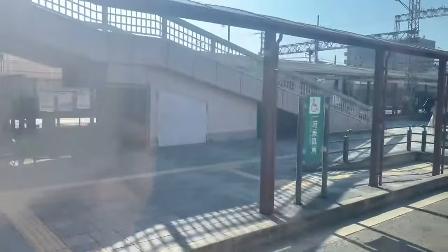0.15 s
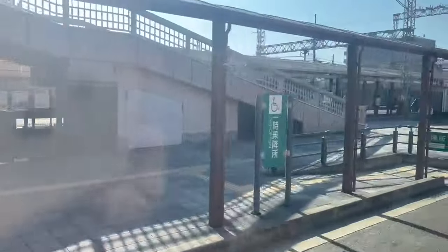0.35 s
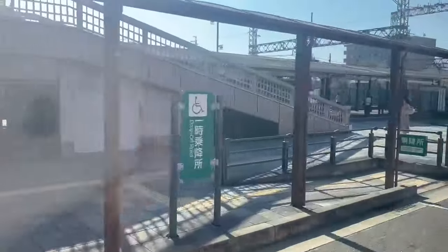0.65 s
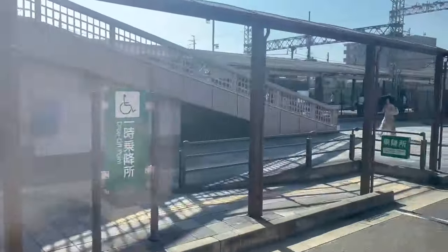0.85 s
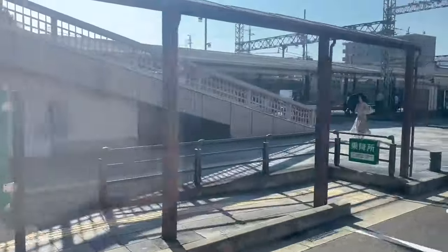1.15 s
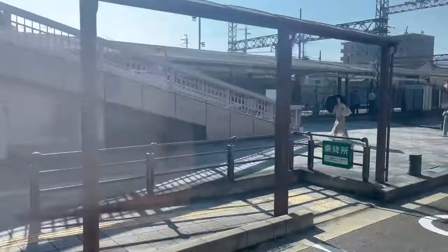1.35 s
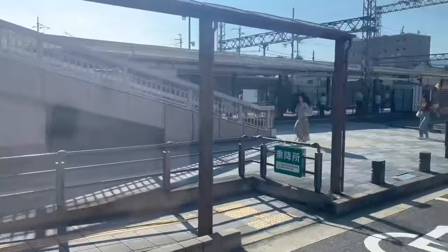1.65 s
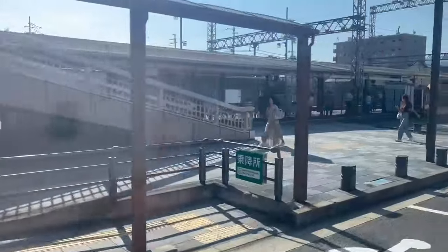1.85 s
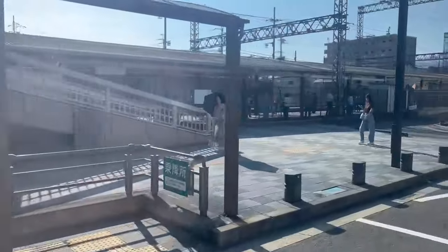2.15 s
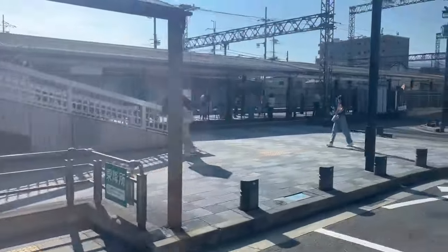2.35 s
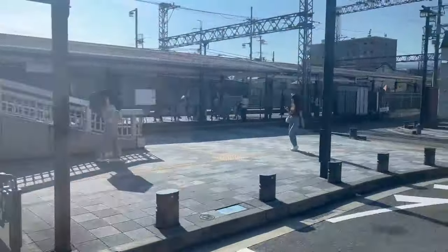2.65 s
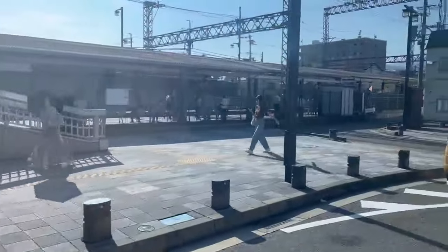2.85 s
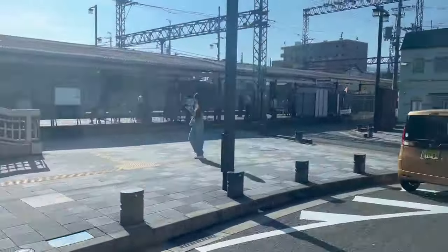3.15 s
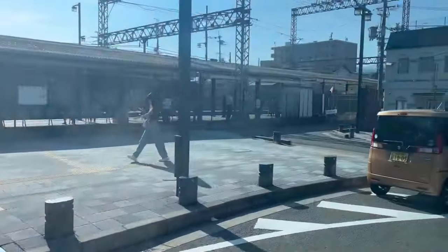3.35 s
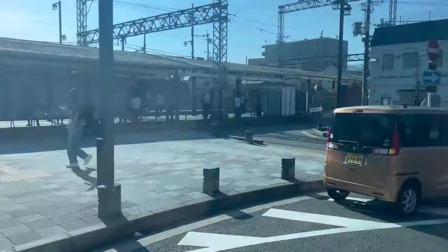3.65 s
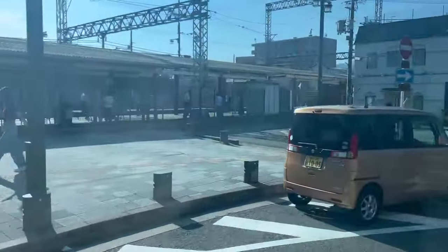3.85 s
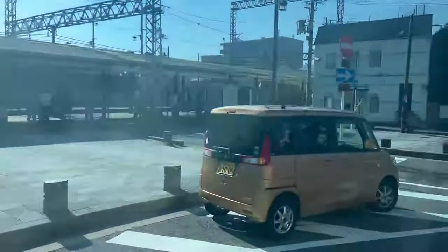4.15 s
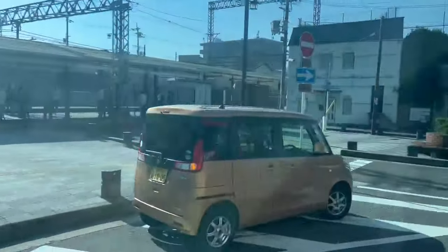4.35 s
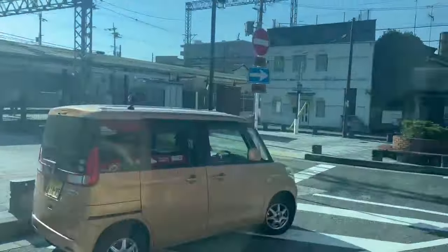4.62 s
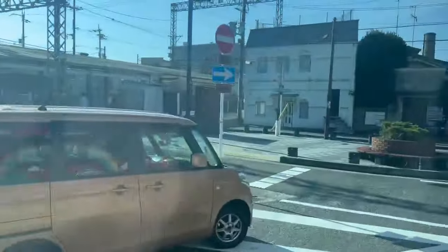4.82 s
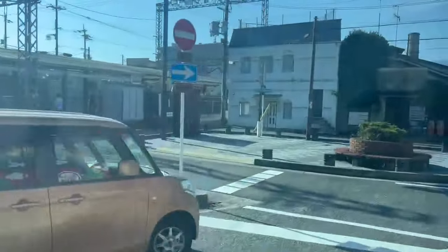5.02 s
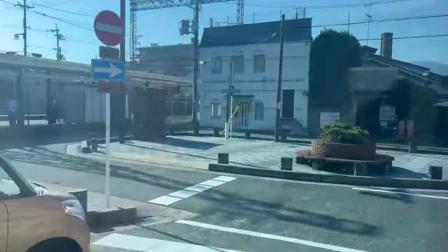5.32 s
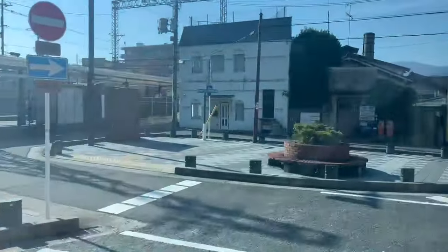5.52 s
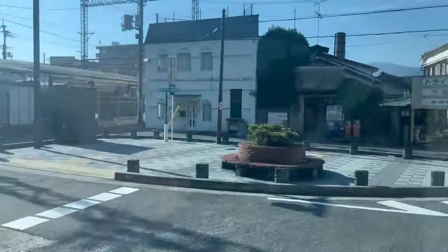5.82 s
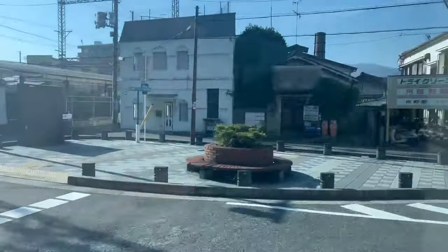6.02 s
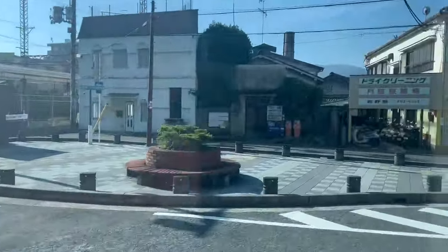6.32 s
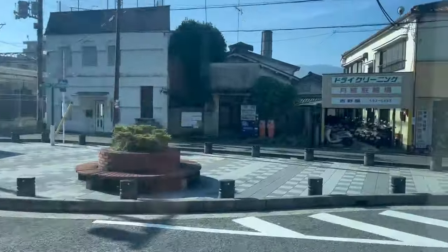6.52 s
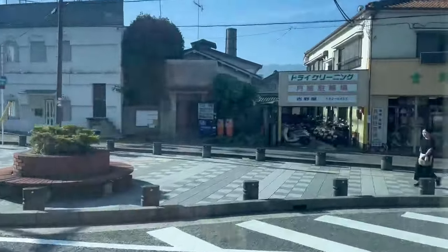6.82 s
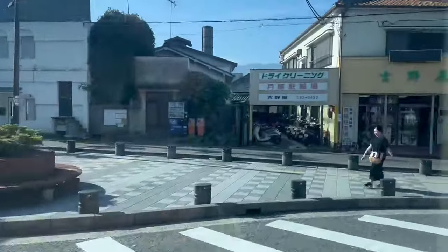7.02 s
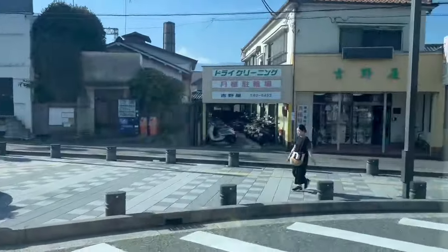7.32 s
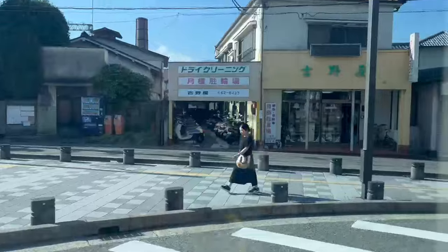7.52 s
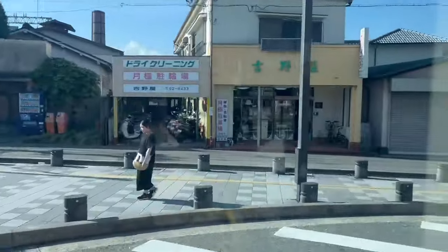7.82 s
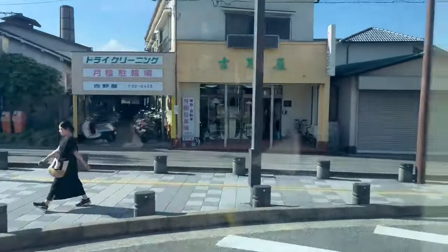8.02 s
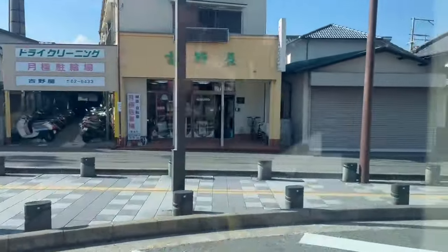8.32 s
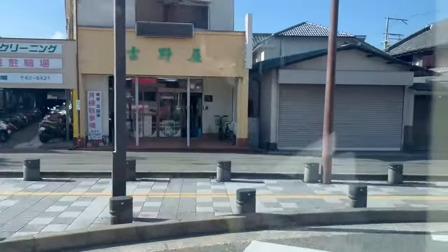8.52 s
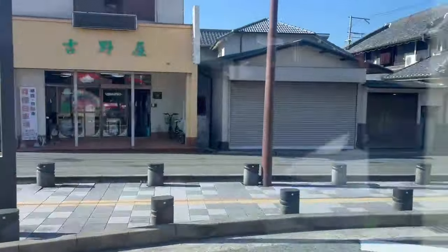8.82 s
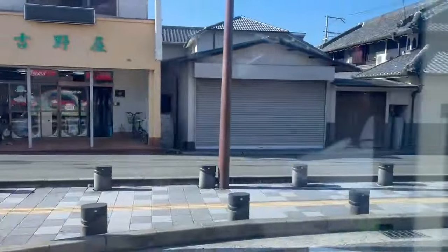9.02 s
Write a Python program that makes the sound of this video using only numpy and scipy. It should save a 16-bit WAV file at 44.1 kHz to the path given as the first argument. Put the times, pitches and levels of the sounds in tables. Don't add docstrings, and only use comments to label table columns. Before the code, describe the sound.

Heard inside a diesel bus slowing through a town street, close stereo microphone in the cabin. A deep engine hum sinks gradually while tyres rumble through the floor and a faint gear whine slides down. Faint high squeaks come first, then dull seam bumps and light ticks. Midway the engine takes load and booms louder; small squeaks and a creak return at the end.

```python
import sys
import numpy as np
from scipy import signal
from scipy.fft import rfft, irfft, next_fast_len
from scipy.io import wavfile

SR = 44100
rng = np.random.default_rng(int(sys.argv[2]) if len(sys.argv) > 2 else 0)


def dump(signal):
    limited = np.clip(np.atleast_2d(signal).T, -1, 1)
    pcm = np.round(limited * 32767).astype(np.int16)
    wavfile.write(sys.argv[1], SR, pcm)


def invert_db(level):
    return 10 ** (np.asarray(level, dtype=float) / 20)


N = 404397
PORT_HALVES = np.array([[.5], [-.5]])

# time_s, firing_rate_hz
SPEED = [(0, 48.55), (.5, 48.2), (1.12, 46.9), (1.75, 43.9), (2.1, 43.25), (2.45, 42.1), (2.9, 41.0),
         (3.55, 39.6), (3.85, 38.7), (4.55, 37.95), (5.4, 36.35), (5.75, 36.45), (6.3, 36.25),
         (6.75, 36.65), (7.7, 35.95), (8.5, 34.25), (8.7, 33.95), (9.17, 33.9)]
# start_s, stop_s, crest_s, swing_hz
SURGES = [
    (1.7, 3.95, 2.1, .22),
    (4.4, 5.85, 5.11, .28),
    (6.6, 8.95, 6.8, .22),
]
SURGE_HZ = 1.99
# time_s, boom_db
LOAD = [(0, -34.5), (4.57, -41), (4.72, -21), (5.25, -19), (5.42, -16.5), (5.66, -20), (5.82, -16),
        (6.3, -15.5), (6.58, -22), (6.8, -15.5), (7.58, -18.5), (7.75, -28.5), (7.98, -20), (8.14, -25),
        (8.4, -20), (8.68, -36.5), (9.05, -23.5), (9.17, -23)]
GIVES_WAY_AT_DB, GIVES_WAY_SLOPE = -30, 1.8
# mode_hz, width_hz, left_db, right_db, left_lead_rad
FLOOR_MODES = [(39.55, 5.9, -26.5, -23, .05), (43, 16, -33, -35.5, .05)]
# mode_hz, width_hz, left_db, right_db, left_lead_rad
TOOTH_MODES = [(344.2, 16, -39, -36.5, -0.12), (320, 16, -37.5, -39, -0.27),
               (294.8, 15, -37.5, -38.5, -1.8), (270.6, 13, -45, -46, -0.49), (243, 11, -42, -36.5, 0.032),
               (227, 19, -43.5, -35.5, -0.49)]
# mode_hz, width_hz, left_db, right_db, left_lead_rad
WHINE_MODES = [(1019, 21, -48, -67, 1), (890, 75, -65, -52.5, -1), (905.6, 19, -45.5, -51, 1.47),
               (866, 30, -56.5, -47.5, 1.5), (831.6, 22, -45, -42, 0.96), (807, 14, -44.5, -65, 4),
               (781.2, 6, -51, -47.5, 1.5), (790, 8, -56.5, -57, 3), (753, 2.1, -59.5, -51.5, 0.5),
               (733.5, 12, -49.5, -46, 2), (725.8, 12, -50.5, -46.5, 2), (710, 10, -50.5, -42.5, 4)]
OVERTONES = {3: (-1, 0), 4: (0, 0), 5: (0, 0), 6: (-2, .3), 9.15: (-1, .5), 10: (2, .5), 11: (0, 0),
             14: (0, -1), 14.5: (0, -.5), 28: (-1, 1.5), 35: (3, -2.4), 42: (0, -1.3), 49: (1, -2)}
SWELLS = {3: [(-.3, .95, -35), (.85, 2.15, -32.5), (7.5, 6.8, -35.5), (8.7, 9.4, -33)],
          4: [(.6, 1.9, -36.5), (3.3, 4.0, -41.5), (7.2, 7.65, -40.5), (8.05, 8.55, -37),
          (8.65, 9.0, -38.5)], 5: [(-.3, 1.0, -44), (1.5, 1.85, -31.5), (4.8, 6.6, -49.5), (7.6, 8.2, -41)],
          6: [(1.25, 2.1, -42.5), (2.5, 3.1, -46), (3.6, 4.3, -46.5), (5.2, 6.6, -45.5)],
          9.15: [(.9, 1.75, -47.5), (1.75, 2.3, -46.5), (2.3, 3.0, -46), (7.9, 8.4, -48.5)],
          10: [(1.0, 2.4, -52.5), (2.8, 4.2, -51)], 14: [(-.2, .7, -58), (3.2, 4.9, -52), (8.4, 9.4, -52)],
          14.5: [(7.52, 8.05, -49.5)], 11: [(6.7, 7.6, -49.5)], 28: [(-.2, 0.82, -65)],
          35: [(1.1, 1.65, -57.5), (1.6, 2.3, -55.5), (5.6, 7.2, -65)], 42: [(.2, .8, -68.5),
          (1.05, 1.35, -61), (1.62, 2.4, -63.5), (4.3, 4.9, -68), (8.4, 8.8, -58.5)],
          49: [(5.3, 6.3, -60.5), (6.2, 7.1, -62.5), (7.0, 7.55, -60.5)]}

# time_s, body_shake_change_db, rumble_db, drone_db
ROAD = [
    (0.0, -0.5, -31, -45.5),
    (1.66, 2, -25, -46),
    (2.58, -0.5, -28, -46.5),
    (5.08, 2, -32, -45.5),
    (8.28, 4, -30, -46),
    (8.43, 0.5, -32.5, -45),
    (9.17, 4.5, -29, -44),
]
# time_s, hiss_db, fine_rattle_db
TRIM = [(0.05, -65.5, -79.5), (3.5, -67.5, -80), (4.03, -68, -81.5), (6.83, -68.5, -83), (7.36, -69, -88),
        (7.96, -69, -78), (8.82, -70, -85), (9.1, -67.5, -79)]
# frequency_hz, density_db (per Hz)
COMMON_LOW = [(13, -38.5), (22, -9), (49, -0.5), (80, 0.5), (168, -12.5), (253, -15), (326, -24.5),
              (517, -26), (624, -34.5), (834, -33.5), (989, -37.5), (1100, -35.5), (1300, -41.5),
              (1690, -74), (2860, -120)]
# frequency_hz, density_db (per Hz)
COMMON_HIGH = [(760, -32), (1300, -2), (1550, -1.5), (2080, -10.5), (2410, -12.5), (2620, -11.5),
               (3230, -19), (4640, -21), (5500, -24.5), (7150, -55), (12100, -120)]
# frequency_hz, density_db (per Hz)
APART_LOW = [(13, -59.5), (22, -27), (68, -2), (91, 2), (183, -8.5), (361, -6.5), (583, -13.5),
             (753, -12.5), (1300, -20.5), (1690, -48), (2860, -120)]
# frequency_hz, density_db (per Hz)
APART_HIGH = [(760, -30), (1300, -1.5), (1630, -4), (1930, -20), (2120, -15.5), (2310, -19.5), (2590, -19),
              (4070, -24.5), (5000, -31), (5300, -27.5), (6890, -59), (11700, -120)]
# low_db, high_db (per Hz)
COMMON_DB = (-43, -83)
# low_db, high_db (per Hz)
APART_DB = (-63.5, -80.5)
# frequency_hz, common_db, apart_db (per Hz)
TOP = [(6050, -121, -109), (6500, -122, -110), (6460, -122, -112), (6740, -117, -113), (8000, -117, -119),
       (8300, -117, -136), (9700, -118, -135), (11100, -128, -128), (11500, -138, -122)]
# frequency_hz, in_step (ratio), quarter_ahead (ratio)
LINK = [(49, -0.05, -0.18), (120.0, -0.18, -0.05), (248, -0.14, -0.04), (418, -0.0028, 0.11),
        (614, -0.16, -0.35), (850.0, -0.06, -0.17), (1150.0, 0.32, -0.31), (1500.0, 0.17, -0.44),
        (2400.0, 0.14, -0.11), (4200.0, 0.34, 0.1), (6300.0, 0.03, -0.065)]

# mode_hz, width_hz, level_db, pan_db
PANEL_MODES = [(1527, 45, -66, 1.5), (1788, 55, -72, 1.5), (1945, 45, -77, 1.5), (2650, 160, -80, 1.5)]
# start_s, peak_db, pitch_hz
BUMPS = [(1.451, -16, 95.5), (2.051, -12, 67.4), (3.051, -26, 80), (1.519, -22.5, 200), (1.686, -12.5, 214),
         (2.258, -26, 110), (3.40, -16, 223), (3.41, -19, 306), (3.415, -28, 450), (3.443, -9, 95),
         (3.621, -20, 104), (3.641, -15, 174), (3.671, -24, 199), (7.54, -16.5, 192), (4.9, -24, 185),
         (8.369, -23, 247), (8.171, -24, 241), (0.099, -15, 100), (0.878, -14.5, 55), (2.34, -24, 180),
         (2.881, -20.5, 84), (5.702, -23.5, 182), (5.902, -24.5, 186), (8.27, -30, 180)]
# start_s, length_s, level_db
SHIVERS = [(0.247, .1, -71), (1.005, 0.08, -66), (1.0, .19, -68), (1.63, .06, -76), (4.526, .12, -72),
           (5.015, .07, -71), (5.863, .08, -75), (6.797, 0.077, -72.5), (7.99, .06, -73.5),
           (8.479, 0.1, -71)]
SHIVER_HZ, SHIVER_WIDTH_HZ = 4270, 1400
# start_s, stop_s, pitch_hz, level_db
SQUEAKS = [(0.34, 0.42, 3385, -73), (0.412, 0.478, 3350, -66), (0.475, 0.67, 3376, -68.5),
           (0.66, 0.76, 3370, -71), (0.77, 0.83, 3340, -71), (3.048, 3.3, 1520, -62),
           (3.47, 3.53, 1530, -57), (3.47, 3.53, 1660, -60), (3.69, 4.27, 1615, -59.5),
           (8.603, 8.656, 635, -50), (8.248, 8.42, 1210, -60.5), (7.77, 7.93, 1515, -55),
           (8.843, 8.917, 1480, -48), (8.902, 8.97, 1455, -56), (8.962, 9.002, 1460, -46),
           (9.097, 9.154, 1563, -48.5)]
# start_s, length_s, centre_hz, width_hz, level_db
CREAKS = [(.47, .16, 2600, 130, -70), (.97, .16, 2620, 100, -69), (1.03, .05, 3900, 400, -71),
          (1.05, 0.11, 3100, 200, -68), (4.9, .12, 3000, 250, -68), (7.62, .035, 2300, 900, -66),
          (9.04, 0.064, 1000, 100, -53), (9.03, 0.12, 690, 60, -46), (8.8, 0.3, 39, 47, -35.5)]
# start_s, centre_hz, level_db
RATTLES = [(1.028, 4270, -71.5), (1.027, 9840, -82.5), (1.988, 4300, -69), (2.29, 4600, -70),
           (2.533, 9080, -81), (2.61, 7640, -79), (2.61, 4740, -68), (2.681, 5300, -70), (2.871, 9040, -80),
           (2.877, 6700, -72.5), (3.224, 6630, -76), (3.296, 8200, -82), (3.469, 8850, -77.5),
           (3.995, 6700, -75), (3.996, 4900, -68), (3.89, 6500, -72), (4.693, 8000, -80.5),
           (4.826, 3880, -68), (5.085, 8330, -81), (5.755, 5060, -72.5), (6.523, 8970, -82.5),
           (7.618, 2330, -62.5), (7.806, 9200, -82.5), (7.922, 8330, -83.5), (8.505, 4000, -66.5),
           (8.858, 7700, -76.5), (8.857, 4800, -71.5), (8.984, 8930, -80)]
TICK_S, TICK_WIDTH_HZ = 0.05, 2300
TICK_LATE_S, TICK_ATTACK_S = 0.0059, 0.0028
# low_hz, high_hz
NULL_HZ = (5560, 5830)

BASS_CUT_HZ = 33.8
CLOCK_HZ, CLOCK_DB = 9600, -65.0
# start_s, stop_s
CLOCK_HEARD_S = (4.68, 7.76)
STOP_S = .0002


def in_time(rows):
    s, *columns = np.transpose(rows)
    return [np.interp(np.arange(N) / SR, s, column) for column in columns]


def at_hz(points, hz):
    points = np.array(points)
    return np.interp(np.log(hz), np.log(points[:, 0]), points[:, 1])


def drift(rate_hz):
    r = np.exp(-80 * np.pi * rate_hz / SR)
    slow = signal.lfilter([1], [1, -2 * r, r * r], rng.standard_normal(N // 40 + 2002))[2000:]
    return np.interp(np.arange(N) / 40, np.arange(len(slow)), slow / slow.std())


def swell(start, stop, edge=.12):
    t = np.arange(N) / SR
    return np.clip(np.minimum(t - start, stop - t) / edge, 0, 1)


def tone(turns, db, lead=0):
    return np.sqrt(2) * invert_db(db) * np.sin(2 * np.pi * turns + PORT_HALVES * lead)


def through(modes, multiple, hz, turns, change_db):
    scale = multiple * np.linspace(30, 52, 2000)
    response = 0
    for mode_hz, width_hz, left_db, right_db, lead in modes:
        peak = invert_db(np.array([[left_db], [right_db]])) * np.exp(1j * PORT_HALVES * lead)
        response = response + peak / (1 + (2 * (scale - mode_hz) / width_hz) ** 4)
    gain = np.array([np.interp(multiple * hz, scale, port) for port in response])
    return np.sqrt(2) * invert_db(change_db) * np.imag(gain * np.exp(2j * np.pi * multiple * turns))


def engine(waver_db=2.0, low_waver_db=0.5, boom_waver_db=0.4):
    t = np.arange(N) / SR
    hz, = in_time(SPEED)
    for start, stop, crest, swing in SURGES:
        hz = hz + swing * swell(start, stop) * np.cos(2 * np.pi * SURGE_HZ * (t - crest))
    turns = np.cumsum(hz) / SR
    boom_db, = in_time(LOAD)
    yielded_db = -GIVES_WAY_SLOPE * np.maximum(boom_db - GIVES_WAY_AT_DB, 0)
    out = through(FLOOR_MODES, 0.96, hz, turns, yielded_db + low_waver_db * drift(1.1))
    out += tone(2 * turns, boom_db + boom_waver_db * drift(34.0), lead=-0.022)
    out += through(TOOTH_MODES, 7, hz, turns, waver_db / 2 * drift(4.0))
    out += through(WHINE_MODES, 21, hz, turns, waver_db / 2 * drift(4.0))
    for multiple, (pan_db, lead) in OVERTONES.items():
        gain = sum(invert_db(db) * swell(start, stop) for start, stop, db in SWELLS[multiple])
        side_db = waver_db * drift(1.9) + PORT_HALVES * pan_db
        out += gain * tone(multiple * turns + rng.random(), side_db, lead)
    return out


def joined(low, high, levels_db, top):
    low_part = np.array(low[:-2]) + [0, levels_db[0]]
    high_part = np.array(high[1:-2]) + [0, levels_db[1]]
    return np.vstack([low_part, high_part, top])


def road_and_air(patchy_db=.8, rattle_db=.4, own_db=1.6, steadied=.45, lumpy_db=1.5):
    size = next_fast_len(N)
    hz = np.maximum(np.arange(size // 2 + 1) * SR / size, 1)
    top, link = np.array(TOP), np.array(LINK)
    common_db = at_hz(joined(COMMON_LOW, COMMON_HIGH, COMMON_DB, top[:, [0, 1]]), hz)
    apart_db = at_hz(joined(APART_LOW, APART_HIGH, APART_DB, top[:, [0, 2]]), hz)
    shared, other = rfft(rng.standard_normal((2, size)))
    follow = at_hz(link[:, [0, 1]], hz) + 1j * at_hz(link[:, [0, 2]], hz)
    other = follow * shared + np.sqrt(np.clip(1 - abs(follow) ** 2, 0, 1)) * other
    spectra = np.array([shared * invert_db(common_db), other * invert_db(apart_db)]) * np.sqrt(SR / 2)

    changes_db = np.array([c - np.mean(c) for c in in_time(ROAD) + in_time(TRIM)])
    load_db = np.maximum(in_time(LOAD)[0] - GIVES_WAY_AT_DB, 0)
    rattle, out = drift(22), 0
    for centre in 30 * 2 ** np.arange(0, 9, .7):
        mask = np.cos(np.pi / 2 * np.clip(np.log2(hz / centre) / .7, -1, 1)) ** 2
        mid, side = irfft(spectra * mask, size)[:, :N]
        shares = [at_hz(np.c_[[45, 170, 550, 3600, 8000], one], centre) for one in np.eye(5)]
        flicker_db = patchy_db * drift(14.0) + rattle_db * (shares[3] + shares[4]) * rattle
        flicker_db += own_db * shares[4] * drift(20) + lumpy_db * shares[0] * drift(4)
        flicker_db -= steadied * load_db * (60 < centre < 100)
        out = out + invert_db(np.dot(shares, changes_db) + flicker_db) * np.array([mid + side, mid - side])
    return out


def panels(swing_db=2.2, lead=-1.2):
    out = 0
    for hz, width_hz, level_db, pan_db in PANEL_MODES:
        r = np.exp(-np.pi * width_hz / SR)
        poles = [1, -2 * r * np.cos(2 * np.pi * hz / SR), r * r]
        ring = signal.lfilter([1, 0, -1], np.convolve(poles, poles), rng.standard_normal(N + SR))
        lag = round(lead / (2 * np.pi * hz) * SR)
        pair = np.array([ring[SR // 2:][:N], ring[SR // 2 - lag:][:N]]) / ring.std()
        out = out + invert_db(level_db + swing_db * drift(1.8) + PORT_HALVES * pan_db) * pair
    return out


def bumps(t60=0.046, cycles=3.0):
    out, t = np.zeros(N), np.arange(SR // 4) / SR
    for s, peak_db, hz in BUMPS:
        envelope = (1 - np.exp(-t / 0.0078)) * invert_db(-60 * t / (t60 + cycles / hz))
        out[round(s * SR):][:len(t)] += invert_db(peak_db) * 2 * envelope * np.sin(2 * np.pi * hz * t)
    return out


def blow(size, length):
    t = np.maximum(np.arange(size) / SR - 0.22 * length - TICK_LATE_S, 0)
    closing = np.minimum(np.arange(size)[::-1] / (.1 * size), 1)
    return 1.6 * (1 - np.exp(-t / TICK_ATTACK_S)) * np.exp(-t / (0.73 * length)) * closing


def rubs(events, pan_db, struck=False):
    alike = [(75, .3), (105, .93), (1500, .6), (5000, .6), (6300, .05), (7300, .7), (8000, 1)]
    out = np.zeros((2, N))
    for s, length, hz, width, level_db in events:
        edges = [max(hz - width / 2, 50), hz + width / 2]
        band = signal.butter(3, edges, "band", fs=SR, output="sos")
        noise = signal.sosfilt(band, rng.standard_normal((2, SR // 2)))
        mid, side = noise[:, -round(1.7 * length * SR):]
        share = at_hz(alike, hz)
        rub = np.sqrt(share) * mid + np.sqrt(1 - share) * side * np.array([[1], [-1]])
        envelope = blow(len(mid), length) if struck else np.hanning(len(mid))
        part = invert_db(level_db + PORT_HALVES * pan_db) * rub / rub.std() * envelope
        spot = out[:, round((s - .3 * length) * SR):][:, :len(mid)]
        spot += part[:, :spot.shape[1]]
    return out


def past_ports(x):
    common = x.mean(axis=0)
    notch = signal.butter(2, NULL_HZ, "bandstop", fs=SR, output="sos")
    return x - common + signal.sosfilt(notch, common)


def shivers():
    events = [(s, length, SHIVER_HZ, SHIVER_WIDTH_HZ, db) for s, length, db in SHIVERS]
    return invert_db(5.0) * past_ports(rubs(events, 1.5))


def squeaks(waver_hz=9, pan_db=5.0, edge=0.013, flutter_db=2.0):
    waver, out = np.cumsum(waver_hz * drift(30)) / SR, np.zeros((2, N))
    flutter = flutter_db * drift(25)
    for start, stop, hz, db in SQUEAKS:
        span = slice(round(start * SR), min(round(stop * SR), N))
        t = np.arange(N)[span] / SR
        envelope = np.clip(np.minimum(t - start, stop - t) / edge, 0, 1)
        out[:, span] += envelope * tone(hz * t + waver[span], db + flutter[span], lead=-1.5)
    return out * invert_db(PORT_HALVES * pan_db)


def creaks():
    return rubs(CREAKS, 4.0)


def ticks():
    events = [(s, TICK_S, hz, min(TICK_WIDTH_HZ, hz / 2), db) for s, hz, db in RATTLES]
    return invert_db(5.0) * past_ports(rubs(events, 1.5, struck=True))


def scene():
    return engine() + road_and_air() + panels() + bumps() + shivers() + squeaks() + creaks() + ticks()


def top_cut(x):
    return signal.sosfilt(signal.butter(12, 11500, fs=SR, output="sos"), x)


def record(dry):
    dry = signal.sosfilt(signal.butter(2, BASS_CUT_HZ, "high", fs=SR, output="sos"), dry)
    clock = invert_db(CLOCK_DB) * swell(*CLOCK_HEARD_S) * np.cos(2 * np.pi * CLOCK_HZ * np.arange(N) / SR)
    mixed = dry + clock * dry.mean(axis=0)
    mixed = mixed * swell(-STOP_S / 2, N / SR + 1, STOP_S)
    mixed = mixed * swell(-1, N / SR + 5 * STOP_S, 10 * STOP_S)
    return top_cut(mixed)


dry = scene()
out = record(dry)
dump(out)
```